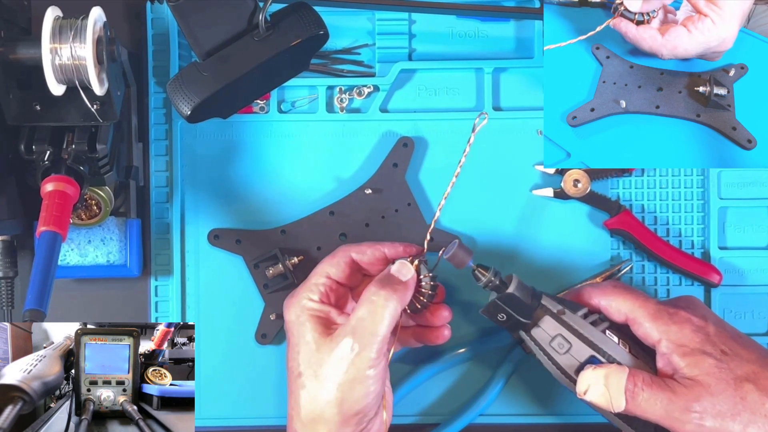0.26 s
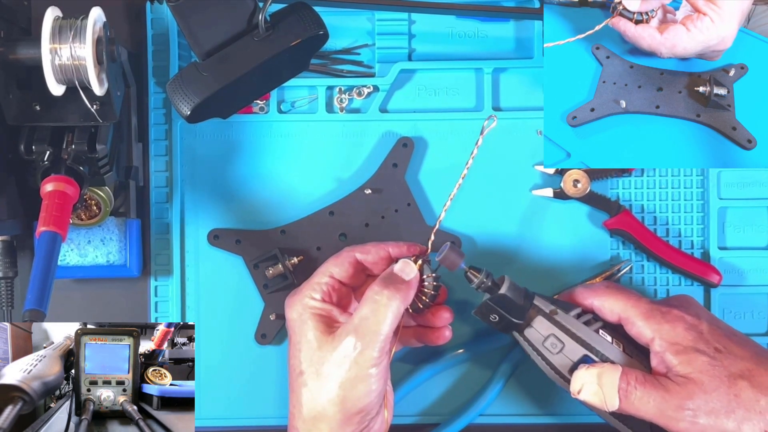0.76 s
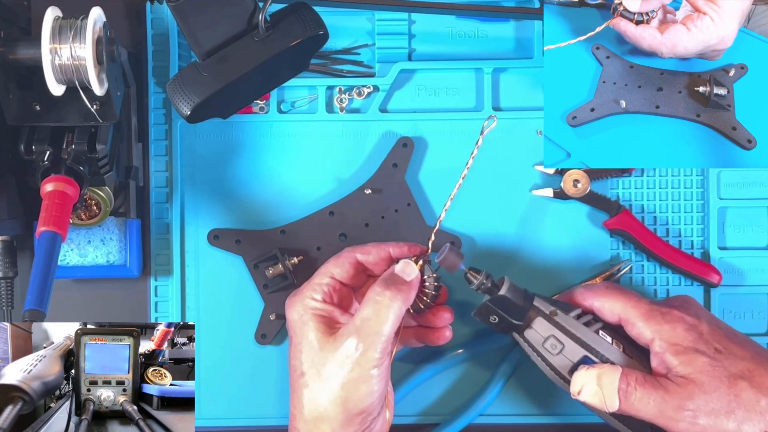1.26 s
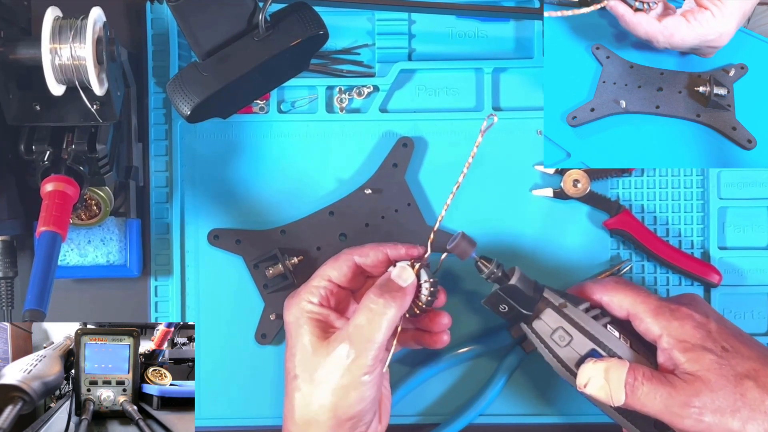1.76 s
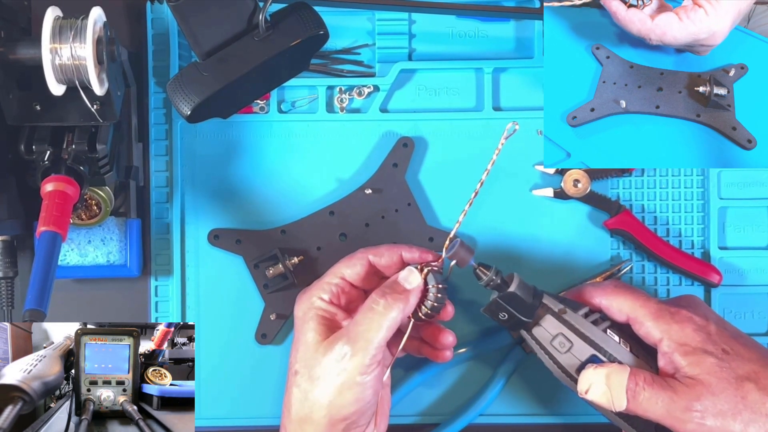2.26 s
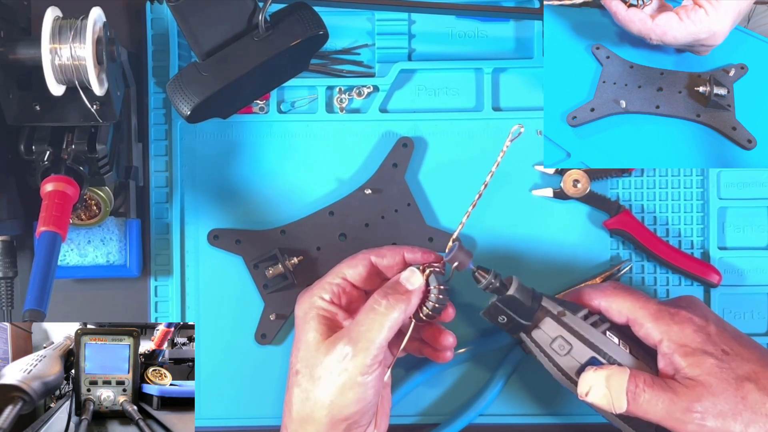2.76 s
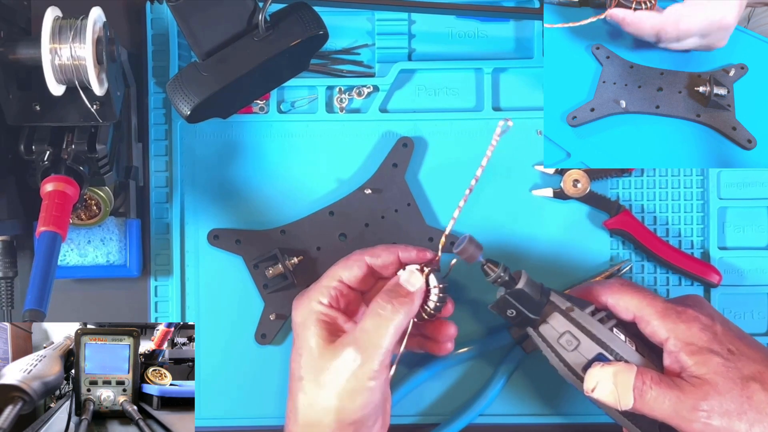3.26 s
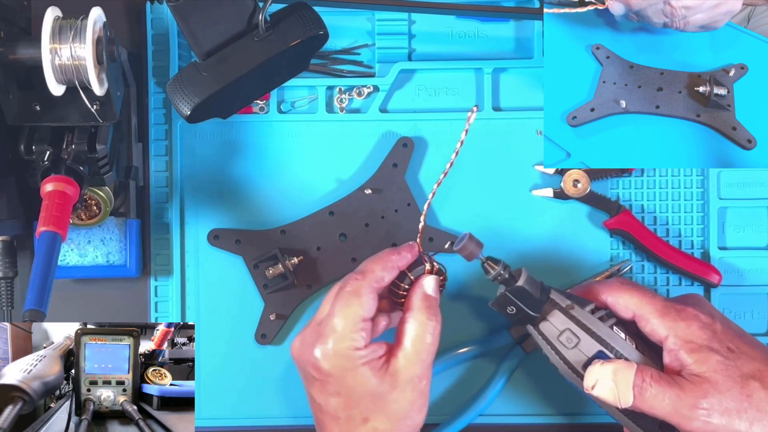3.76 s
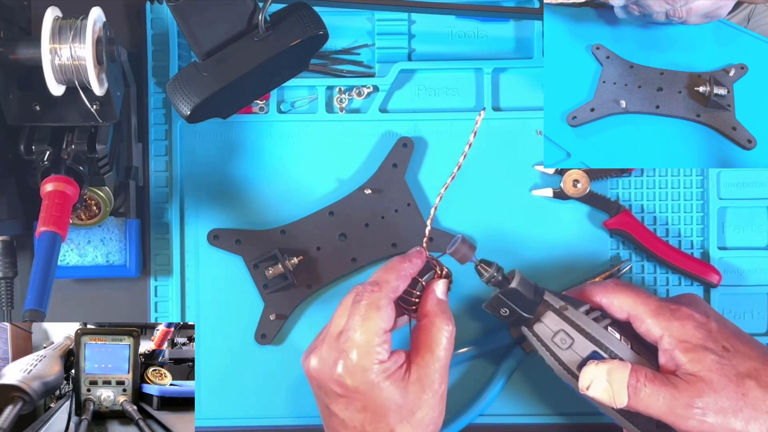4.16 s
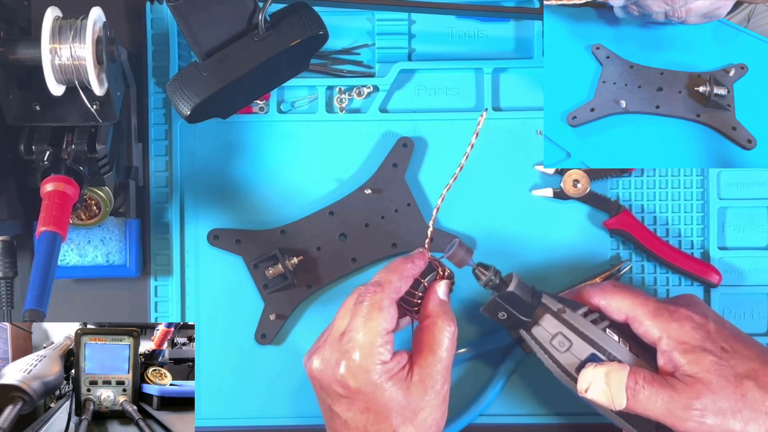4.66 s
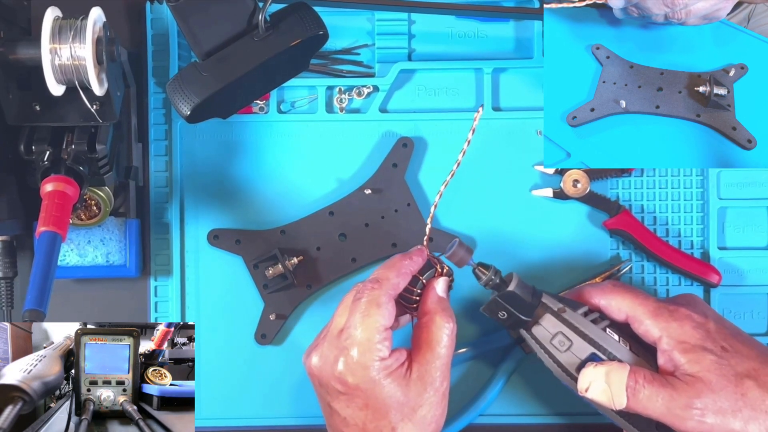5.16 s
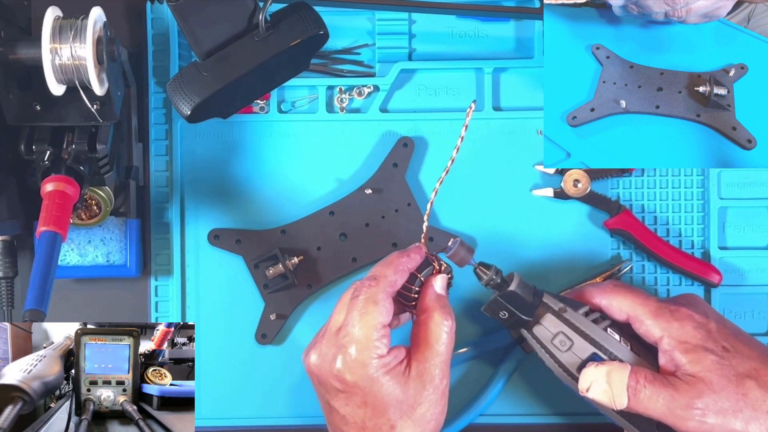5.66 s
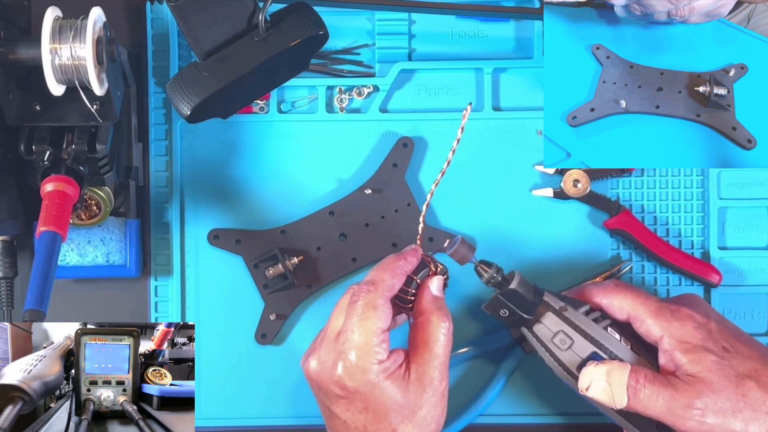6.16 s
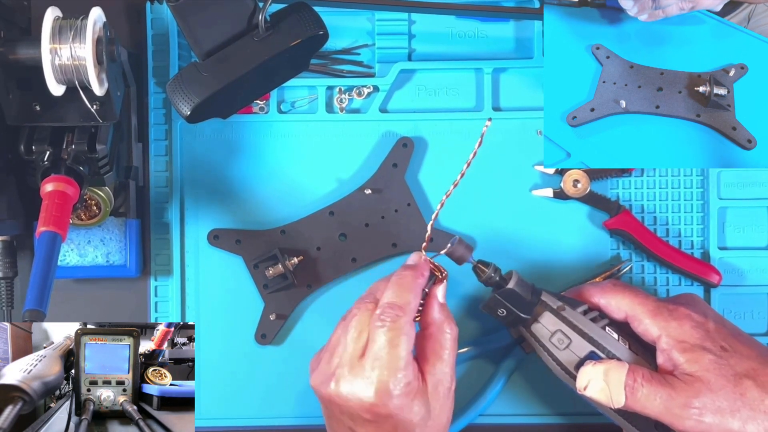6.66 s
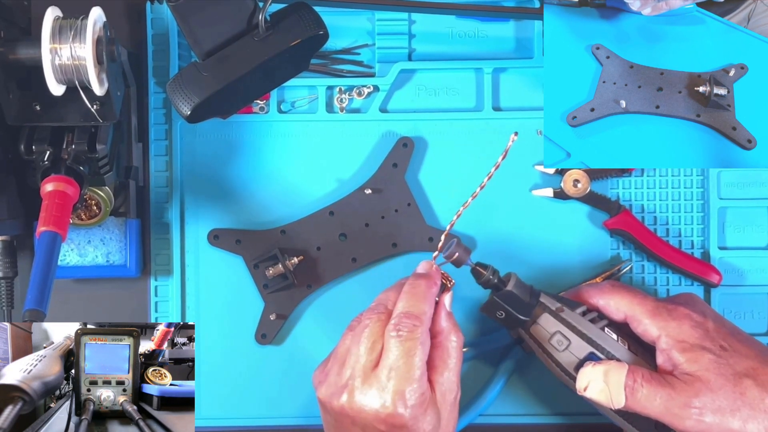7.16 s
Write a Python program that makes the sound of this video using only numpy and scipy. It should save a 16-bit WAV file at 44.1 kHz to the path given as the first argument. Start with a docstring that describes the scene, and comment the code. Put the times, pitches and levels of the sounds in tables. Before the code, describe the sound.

Close up at a workbench, a little motor tool hums, buzzes and whines without stopping. Rough, fluttering scratches of grit on wire come and go: longer ones first, a gap of bare motor, a cluster of short rasps, then faint catches and one final stroke that grows harder. The motor's pitch sags under load and rises when freed. Dry sound, hardly any echo, faint low room hum.

```python
"""A small motor tool buzzes and whines over a workbench; again and again its sanding bit rasps a wire.
The chopped mains current knocks the motor 120 times a second, and each knock rings briefly.
Fan and commutator whine on the wandering shaft speed, with a rush of air and brush noise.
The grit scratches the wire, hardest once or twice a turn: the wire hisses and the tool's housing rings."""
import sys
import numpy as np
from scipy import signal
from scipy.io import wavfile
from scipy.ndimage import uniform_filter1d

SR = 44100
rng = np.random.default_rng(int(sys.argv[2]) if len(sys.argv) > 2 else 0)


def file_out(sig):
    """Save sig as 16-bit WAV at sys.argv[1]."""
    # one column per channel
    cols = np.atleast_2d(sig).T
    # limit, then scale
    lim = np.clip(cols, -1, 1)
    pcm = np.round(lim * 32767).astype(np.int16)
    wavfile.write(sys.argv[1], SR, pcm)


N = 326781
TIME = np.arange(N) / SR  # s
BINS = np.fft.rfftfreq(8192, 1 / SR)  # Hz

# middle speed of the shaft, before its small wobble: t/s, speed/(turns per s)
SHAFT_SPEED = [(0, 71), (.22, 72.3), (.35, 70.7), (.66, 72), (1.06, 61.5), (1.65, 61.7), (2.12, 68),
               (2.42, 60), (3.03, 60), (3.36, 70.2), (3.64, 70.6), (3.73, 74), (3.95, 75.6), (4.05, 78),
               (4.3, 71.5), (4.57, 74.6), (5.25, 67.5), (5.7, 74.4), (5.8, 72.8), (5.92, 75.3), (6.0, 74.5),
               (6.08, 78), (6.28, 74.2), (6.46, 75.8), (6.68, 70.6), (6.93, 75.6), (7.2, 71)]
# strokes that press the wire to the bit: start/s, length/s, attack/s, release/s, hiss level/dB,
# ring level/dB, change of push from start to end/dB, relative depth of the once-a-turn bite
WIRE_STROKES = [ (0.371, .365, 0.025, .07, -41.5, -42.5, 5.5, 1.5),
                (.769, 0.54, 0.023, 0.04, -40, -42, -6, 1), (1.735, 0.57, 0.1, 0.11, -42.5, -42.5, -1, 0.5),
                (2.168, 0.96, 0.14, 0.067, -42, -43.5, -5, 0.9),
                (4.066, 0.27, 0.034, 0.067, -40, -35, 1.5, 1.6),
                (4.36, 0.17, 0.041, 0.062, -41.5, -38.5, 7, 1.5),
                (4.547, 0.19, 0.021, 0.083, -40, -38, 2, 2), (4.711, .2, 0.063, 0.097, -38.5, -40, 5, 1.5),
                (4.872, 0.497, 0.1, 0.1, -39.5, -37, 0.5, 2),
                (5.303, .22, 0.066, .025, -45.5, -43.5, 14, 3.5),
                (5.5, 0.22, 0.039, 0.08, -48.5, -43, 6, 5), (6.924, 0.48, 0.036, 0.014, -47, -47.5, 19, 1),
                ]
# housing resonances that the grit rings: f/Hz, width/Hz, relative level/dB
HOUSING_MODES = [(1410, 100, -8), (1910, 81, 4.5), (2207, 215, -3.5), (3014, 24, -9)]
# resonances of the mandrel: f/Hz, width/Hz, relative level/dB
MANDREL_MODES = [(6080, 110, -1), (7144, 220, -0.5), (8270, 490, 2.5), (9170, 1030, -3.5),
                 (12600, 320, -13)]
# broad hiss of the grit: f/Hz, relative level per Hz/dB
GRIT_HISS = [(150, -38), (650, -9), (1200, -14), (1800, 1.5), (3100, 0.5), (3900, -4), (5500, -5.5),
             (8000, -10), (10800, -5), (12000, -11), (14000, -14.5), (16000, -18.5)]
# rush of the fan and brushes: f/Hz, relative level per Hz/dB
AIR_RUSH = [(100, -31), (300, -20), (580, -10), (1050, -7), (1300, -17), (2600, -16.5), (3300, -16),
            (4700, -17.5), (5600, -22), (7300, -21.5), (9200, -26.5), (11000, -28.5), (16000, -38)]
# resonances of the running tool: f/Hz, width/Hz, relative level/dB
TOOL_MODES = [(401, 21.5, -2.5), (680, 63, -6.5), (891, 43, 0.3), (1450, 27, -23), (1880, 170, -11),
              (2373, 133, -2), (4360, 320, -18), (6320, 360, -17.5), (8850, 340, -21.5)]

# the two housing modes that the fingers damp more or less: f/Hz, width/Hz
GRIP_MODE, BIT_MODE = (915, 66), (1688, 43.4)
KNOCKS_PER_S = 120  # two for each mains cycle


def amp(db):
    """Turns decibels into gain."""
    return 10 ** (np.asarray(db) / 20)


def evened(x):
    """Scales a sound to an rms of one."""
    return x / np.sqrt(np.mean(x ** 2) + 1e-20)


def curves(rows):
    """Joins each column of a table of times by straight lines."""
    s, *columns = np.transpose(rows)
    return [np.interp(TIME, s, column) for column in columns]


def drift(hz):
    """Random wander with rms one: hz new values a second, joined by straight lines."""
    return evened(np.interp(TIME * hz, np.arange(4096), rng.standard_normal(4096)))


def slope(points):
    """Power at each frequency of a broad spectrum."""
    hz, db = np.transpose(points)
    return amp(np.interp(np.log(BINS + 1), np.log(hz), db)) ** 2


def peaks(modes):
    """Power at each frequency of a set of resonances with steep skirts."""
    return sum(amp(db) ** 2 / (1 + ((BINS - hz) / width) ** 2) ** 2 for hz, width, db in modes)


def top(db, edge_hz=10500):
    """Power of a shelf that raises or lowers the treble."""
    return amp(db / (1 + (edge_hz / (BINS + 1)) ** 8)) ** 2


def colour(x, power):
    """Gives x this power spectrum with a filter that rings only after each impact; rms one."""
    log_gain = np.log(power / power.max() + 1e-10) / 2
    mirrored = np.r_[log_gain, log_gain[-2:0:-1]]
    # the Hilbert transform finds the phase that puts the energy as early as possible
    taps = np.fft.ifft(np.exp(signal.hilbert(mirrored).conj())).real
    return evened(signal.oaconvolve(x, taps[:len(BINS)])[:len(x)])


def each_turn(turns, size=120, wear_per_turn=0.00298):
    """Small impacts come round again with every turn of the shaft and slowly change in height."""
    place, phase, pace = rng.random(size), rng.random(size), rng.standard_normal(size)
    turn = np.arange(int(turns[-1]) + 1)[:, None]
    height = np.cos(2 * np.pi * (phase + wear_per_turn * pace * turn))
    passes = np.interp(turn + place, turns, np.arange(N))
    impacts = np.bincount(np.round(passes).astype(int).ravel(), height.ravel(), N)
    impacts[-1] = 0  # drops the impacts that would fall after the end
    return evened(impacts)


def room(level_db=-66, hum_db=-69.5, fade_db=-8):
    """Steady room noise and a faint mains hum that slowly fades."""
    # spectrum of the room noise: f/Hz, relative level per Hz/dB
    room_tone = [(5, 0.5), (25, -1), (50, -6.5), (80, -13.5), (170, -19), (215, -13.5), (270, -14.5),
                 (500, -47), (2000, -46)]
    hum = amp(hum_db + fade_db * TIME / TIME[-1]) * np.sin(2 * np.pi * KNOCKS_PER_S * TIME)
    return hum + amp(level_db) * colour(rng.standard_normal(N), slope(room_tone))


def air(turns, level_db=-51, throb=0.22, unrest_db=1.34):
    """Fan and brush noise in the housing: a chance rush and a rattle that repeats with the shaft."""
    db_per_turn_per_s, idle_turns_per_s = 0.0751, 65.5  # the fan grows louder with speed
    rush = .85 * rng.standard_normal(N) + .53 * each_turn(turns)
    rush = rush * (1 + throb * np.cos(2 * np.pi * turns)) * amp(unrest_db * drift(30))
    speed_db = db_per_turn_per_s * (curves(SHAFT_SPEED)[0] - idle_turns_per_s)
    return amp(level_db + speed_db) * colour(rush, slope(AIR_RUSH) + peaks(TOOL_MODES))


def whine(turns, level_db=-55.0, db_per_turn_per_s=0.4, full_turns_per_s=74):
    """Fluttering tones at multiples of the shaft speed swell as they pass the tool's resonances."""
    # tones of fan, commutator and bearings: multiple of shaft speed, relative level/dB
    shaft_orders = [(12, -14), (13, -14), (25, 0), (27, -5), (29, -5), (32, -4), (56, 0), (64, -11),
                    (70, -5)]
    lines = 0
    for order, db in shaft_orders:
        level = amp(db + 3.1 * drift(35))
        lines = lines + level * np.sin(2 * np.pi * round(order) * turns + 0.48 * drift(70))
    # the whine grows with speed until full_turns_per_s
    slow_db = db_per_turn_per_s * np.minimum(curves(SHAFT_SPEED)[0] - full_turns_per_s, 0)
    return amp(level_db + slow_db) * colour(lines, slope(AIR_RUSH) + peaks(TOOL_MODES))


def knocks(turns, swing_db=6.5, scatter_db=2.5, segments_per_turn=8):
    """Each half cycle of the mains jolts the motor; the commutator's place sets the jolt's size and lag."""
    # level of the knocks: t/s, level/dB
    knock_levels = [(0, -53.5), (1.5, -54.5), (2.5, -48), (3.3, -55), (3.9, -50), (4.5, -55.5), (5.9, -50),
                    (6.7, -50.5), (7.4, -60)]
    s = np.arange(1, int(N / SR * KNOCKS_PER_S)) / KNOCKS_PER_S
    late, size = rng.standard_normal((len(s), 2)).T
    segment = segments_per_turn * np.interp(s, TIME, turns) % 1  # place within a commutator segment
    lag_s = .0005 * segment + .00005 * late
    jolts = np.zeros(N)
    place = np.round((s + lag_s) * SR).astype(int)
    jolts[place] = amp(swing_db * np.cos(2 * np.pi * segment) + scatter_db * size)
    ring = peaks([(2300, 290, 0), (880, 100, -16), (6300, 400, -28)])
    return amp(curves(knock_levels)[0]) * colour(jolts, ring)


def touches():
    """Each brief catch or brush of the bit is a puff of hiss and ring that dies away."""
    # catches: t/s, hiss level/dB, ring level/dB, decay/s
    catches = [(0.766, -37, -42, 0.0064), (1.75, -43, -58, 0.015), (1.764, -38.5, -40, 0.009),
               (4.079, -36.5, -48, 0.007), (4.562, -40, -58, 0.042), (5.925, -49, -56, 0.011),
               (6.22, -48, -49, 0.032), (6.523, -53, -37, 0.023), (6.693, -43.5, -38.5, 0.018),
               (6.8494, -36.5, -48, .008), (6.889, -46, -46, 0.0044)]
    brush = rng.standard_normal(N)
    bright = colour(brush, slope(GRIT_HISS) + peaks(MANDREL_MODES) / 2)
    dull = colour(brush, peaks(HOUSING_MODES + [(*BIT_MODE, -2)]))
    out = np.zeros(N)
    for s, hiss_db, ring_db, decay in catches:
        dying = (TIME >= s) * np.exp(-abs(TIME - s) / decay)
        out += dying * (amp(hiss_db) * bright + amp(ring_db) * dull)
    return out


def pressing(start, length, attack, release):
    """Contact of one stroke, from 0 to 1: attack, hold, release."""
    return np.clip((TIME - start) / attack, 0, 1) * np.clip((start + length - TIME) / release, 0, 1)


def digging():
    """Change of push in dB as the bit digs in or eases off for a moment."""
    # moments: t/s, half length/s, extra push/dB
    moments = [(0.546, 0.028, 5.5), (0.8, 0.017, -1), (1.286, 0.04, 9), (1.973, 0.065, 5.5),
               (2.156, 0.033, 5.5), (2.35, 0.053, 3), (3.024, 0.082, 10), (4.194, 0.02, 3),
               (4.463, 0.025, 3.5), (5.12, .09, 2), (6.997, 0.065, 12.5), (7.34, 0.12, -3)]
    return sum(db * np.exp(-((TIME - s) / half) ** 2) for s, half, db in moments)


def bite():
    """Relative depth of the once-a-turn bite: each stroke has its own, and light contact deepens it."""
    graze_bite = 3  # extra while only the bit's high spot reaches the wire
    contacts = np.array([pressing(*row[:4]) for row in WIRE_STROKES])
    total = contacts.sum(0)
    stroke_bite = np.array(WIRE_STROKES)[:, -1] @ contacts / (total + 1e-9)
    return stroke_bite + graze_bite * np.maximum(1 - total, 0)


def scratches(turns, chatter, grain_db=2.0, repeat=0.098, unrest=0.34):
    """Grains strike the wire: the same coarse ones on every turn, among many chance ones."""
    twice_bite = 1  # relative depth of the bite twice a turn, from the oval bit
    grain_gain = amp(grain_db * np.minimum(rng.exponential(1, N), 4))
    fine = rng.standard_normal(N) * grain_gain * (rng.random(N) < .3)
    # high spots bite at once and let go slowly; chatter scales how deep
    let_go = bite() * (turns % 1) + twice_bite * (2 * turns % 1)
    bite_shape = -2 * uniform_filter1d(let_go, size=110)
    force = amp(chatter * (bite_shape + unrest * drift(120)))
    force /= np.sqrt(uniform_filter1d(force ** 2, size=2600))  # keeps the average force steady
    return force * (np.sqrt(repeat) * each_turn(turns) + np.sqrt(1 - repeat) * evened(fine))


def sliding(hiss, shift_db=1.0, shift_hz=9, low_hz=6000, high_hz=10500):
    """The contact slides along the wire, so the bottom and top of the hiss come and go on their own."""
    bottom = signal.sosfiltfilt(signal.butter(3, low_hz, fs=SR, output="sos"), hiss)
    treble = signal.sosfiltfilt(signal.butter(3, high_hz, "high", fs=SR, output="sos"), hiss)
    bottom_change = amp(shift_db / 2 * drift(shift_hz)) - 1
    treble_change = amp(shift_db * drift(shift_hz)) - 1
    return hiss + bottom_change * bottom + treble_change * treble


def held(scrape, shake, grip_db, bit_db, low_hz, low_db, high_hz, high_db, mandrel_db, top_db):
    """The hiss of bit and wire and the ring of the housing for one way of holding the wire."""
    wire_rings = peaks([(low_hz, 500, low_db), (high_hz, 350, high_db)])
    wire = slope(GRIT_HISS) + amp(mandrel_db) ** 2 * peaks(MANDREL_MODES) + wire_rings
    hiss = colour(scrape, wire * top(top_db))
    housing = peaks(HOUSING_MODES + [(*GRIP_MODE, grip_db), (*BIT_MODE, bit_db)])
    # the housing's widest swings are rounded off, so the ring stays dense
    ring = evened(np.tanh(colour(shake, housing) / 3))
    return hiss, ring


def grinding(turns, tremor_db=1.16):
    """Scratches hiss in bit and wire and ring the housing while an unsteady hand presses the wire on."""
    # ways of holding the wire: from t/s, grip mode/dB, bit mode/dB, low wire ring f/Hz, its level/dB,
    # high wire ring f/Hz, its level/dB, mandrel modes/dB, treble shelf of the hiss/dB
    grips = [(0, -3.5, -3, 4330, 0.5, 9160, 4, 5.5, 7), (1.5, -9, 6.5, 4700, -1, 10570, 0.5, 0.5, 8.5),
             (2.1, -7, 1, 4580, 2, 10570, -1.5, 0, 6), (3.6, 1, 3.5, 4600, 0, 8600, -3, 6.5, 6.5),
             (5.25, -5, 1.5, 4700, -1.5, 8150, 5, 2, -2), (6.7, -5, -1, 4500, -14, 9400, 4, 1, 8.5)]
    hiss_share = 0.46  # the ring follows the push in full, the hiss only by this part
    tremor, dig_db = amp(tremor_db * drift(22)), digging()
    scrape = sliding(tremor * scratches(turns, 2.52))
    shake = tremor * scratches(turns, 0.85)
    sounds = [held(scrape, shake, *grip[1:]) for grip in grips]
    out = np.zeros(N)
    for start, length, attack, release, hiss_db, ring_db, change_db, _ in WIRE_STROKES:
        hiss, ring = sounds[sum(start > grip[0] for grip in grips[1:])]  # the grip at this stroke
        on = (TIME > start) & (TIME < start + length)
        push_db = change_db * ((TIME[on] - start) / length - .5) + dig_db[on]
        rasp = amp(hiss_db + hiss_share * push_db) * hiss[on] + amp(ring_db + push_db) * ring[on]
        out[on] += pressing(start, length, attack, release)[on] * rasp
    return out


def bench(x, wet_db=-10, t60=0.04):
    """Adds early echoes from the bench and a small, dry room; they fall 60 dB in t60 seconds."""
    t = TIME[:SR // 3]
    taps = rng.standard_normal(len(t)) * (rng.random(len(t)) < .06) * (t > .002) * amp(-60 * t / t60)
    return x + amp(wet_db) * signal.oaconvolve(x, taps / np.linalg.norm(taps))[:N]


def treble_dropouts(x, above_hz=2700):
    """Short dropouts dull the treble for a few hundredths of a second."""
    # dropouts: middle t/s, length/s, change of treble level/dB
    dropouts = [(1.445, .036, -17), (2.287, .02, -6), (3.703, .036, -15), (4.88, .036, -12),
                (5.713, .03, -12)]
    low = signal.sosfiltfilt(signal.butter(4, above_hz, fs=SR, output="sos"), x)
    dip_db = sum(db * np.exp(-(2 * (TIME - s) / length) ** 4) for s, length, db in dropouts)
    return low + (x - low) * amp(dip_db)


def scene():
    """One wobbling shaft drives the motor's sounds and the grinding."""
    turns = np.cumsum(curves(SHAFT_SPEED)[0] * (1 + .003 * drift(20))) / SR  # turns since the start
    tool = air(turns) + whine(turns) + knocks(turns) + touches() + grinding(turns)
    return (treble_dropouts(bench(tool)) + room())[None]


def record(dry):
    """Band limit: a steep low-pass filter removes the highest treble."""
    edge_hz = 15830
    taps = signal.firwin(801, edge_hz, window=("kaiser", 8), fs=SR)
    return signal.oaconvolve(dry, taps[None], "same")


dry = scene()
out = record(dry)
file_out(out)
```